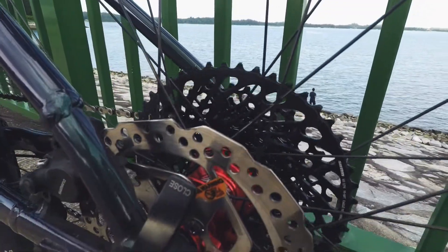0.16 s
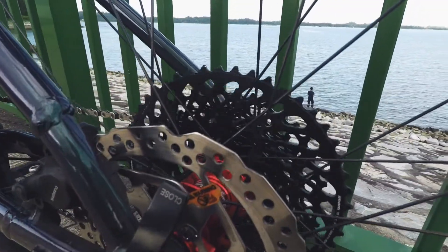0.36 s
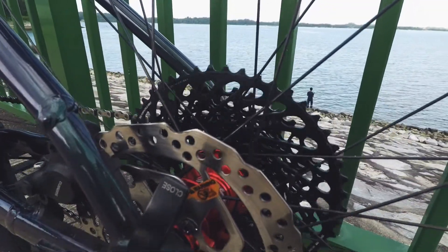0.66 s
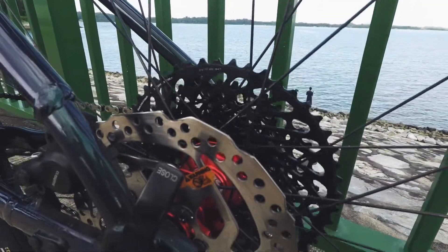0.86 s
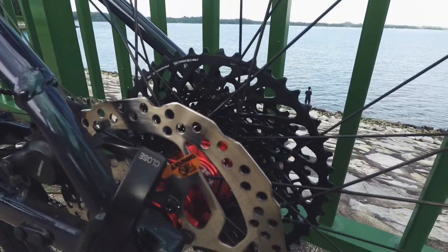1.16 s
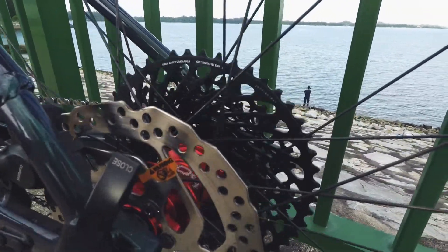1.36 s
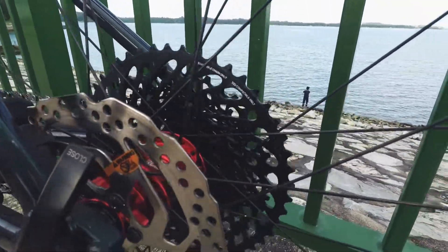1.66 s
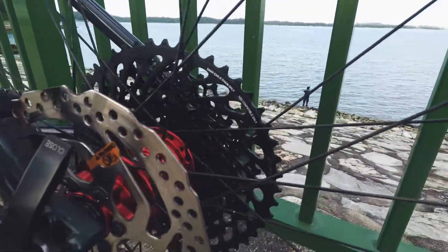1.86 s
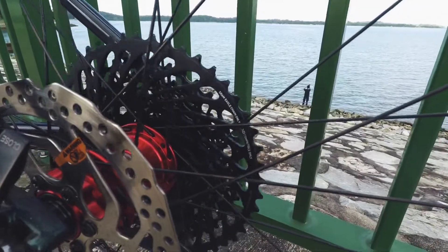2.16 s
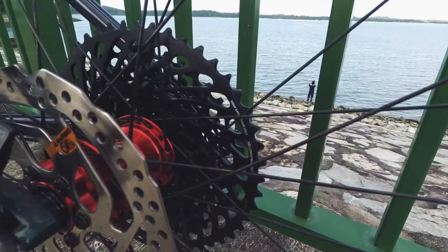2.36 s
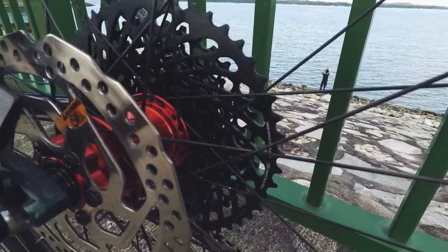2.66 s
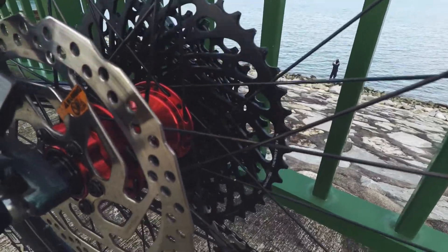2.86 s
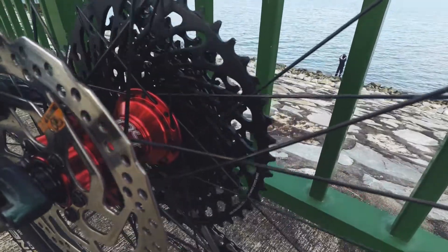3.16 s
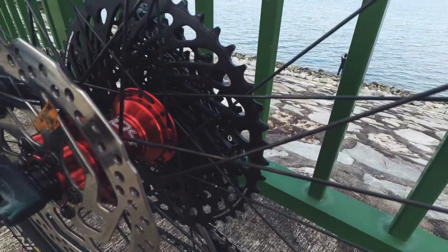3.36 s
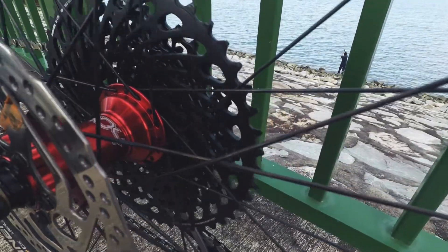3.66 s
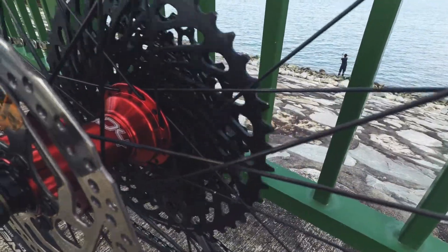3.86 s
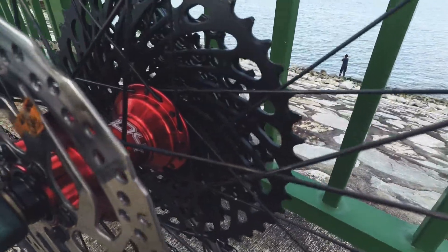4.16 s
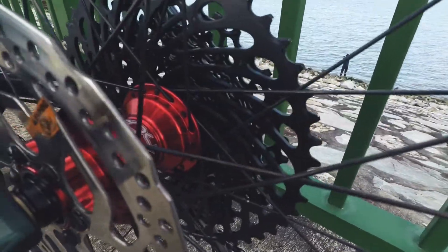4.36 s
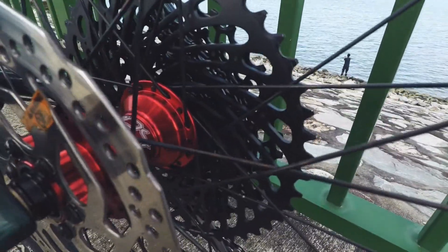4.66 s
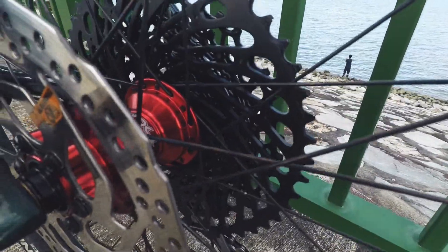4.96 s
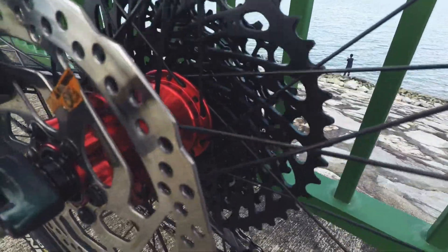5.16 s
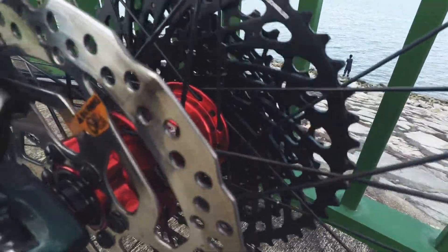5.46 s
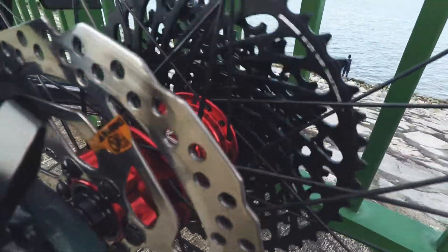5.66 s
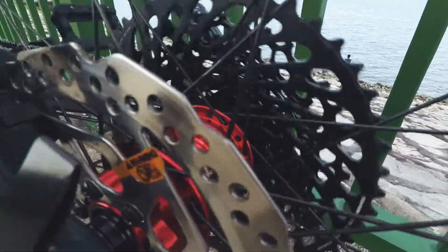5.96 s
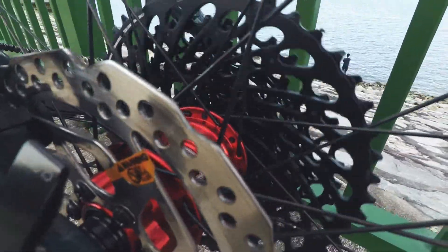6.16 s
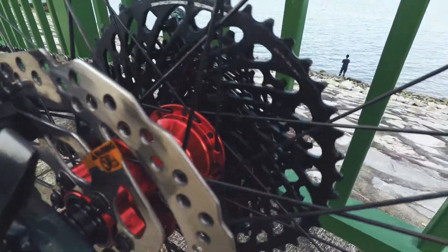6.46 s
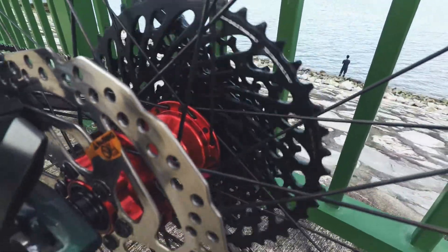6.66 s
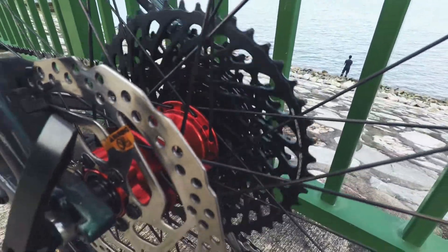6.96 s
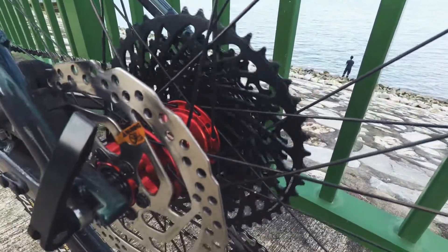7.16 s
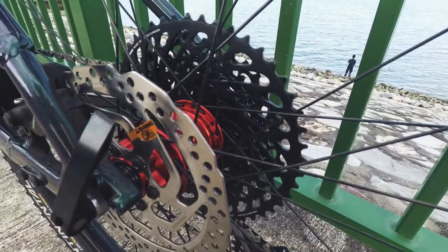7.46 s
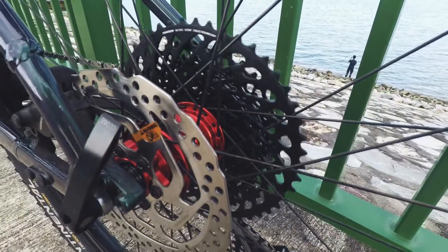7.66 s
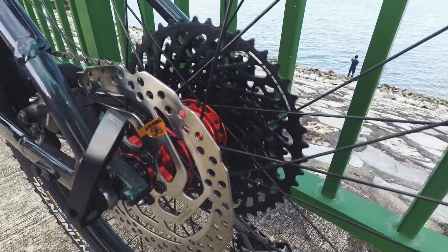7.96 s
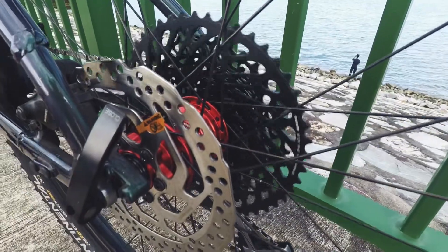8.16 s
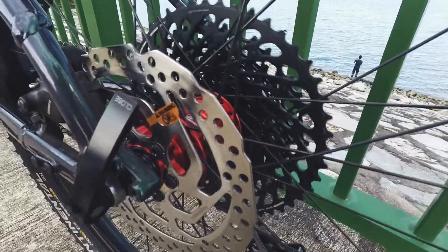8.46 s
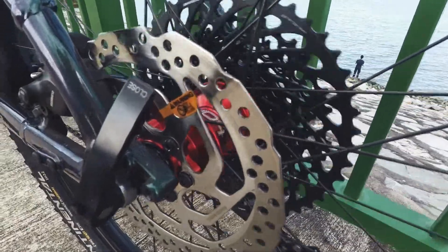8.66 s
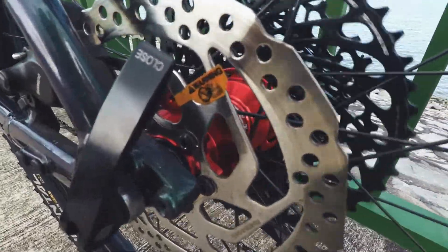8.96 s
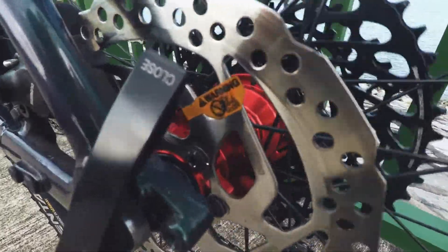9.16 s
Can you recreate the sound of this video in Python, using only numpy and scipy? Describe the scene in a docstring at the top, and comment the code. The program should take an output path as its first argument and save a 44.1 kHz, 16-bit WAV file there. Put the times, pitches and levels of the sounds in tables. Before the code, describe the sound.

A bicycle's rear hub is heard very close, centred and dry, outdoors over a quiet low rumble and thin hiss. From 0.2 s, separate bright steel clicks come unevenly, about ten a second, slowing to five to seven between 2 and 3.4 s, then quickening slightly until 3.8 s. Each has a tiny gritty squeak rising into a sharp snap, then a brief clatter and faint ring. Low wind buffets thump the microphone, strongest at 0.25 s and 1.3-2.5 s, with small crackly rustles. From 3.9 to 4.9 s the hub nearly rests: only faint brushes at 4.3 and 4.8 s. Four slower clicks follow from 5.0 s, then from 5.45 s a continuous ratchet accelerates to around twenty clicks a second, peaking near 6 s, easing around 7 s and wavering until the end at about 9.3 s. Wind dies away after 5 s and returns softly at 8-8.8 s.

```python
"""A bicycle's rear hub ratchets close to a microphone, over a distant outdoor rumble and a thin hiss.
First come slow, uneven clicks while gusts buffet the microphone. In the pause near 4 s only faint brushes
of a pawl are left. Four slow clicks follow, then a continuous run at changing speed; the wind dies down
and comes back near 8 s. For each click a pawl (a sprung catch) scrapes up its tooth with a short squeak,
drops, and rings the hub, cassette and brake rotor. Shaped noise and decaying tones make all of it."""
import sys
import numpy as np
from scipy import signal
from scipy.fft import rfft, irfft
from scipy.io import wavfile
from scipy.ndimage import uniform_filter1d

SR = 44100
rng = np.random.default_rng(int(sys.argv[2]) if len(sys.argv) > 2 else 0)


def transcribe(u):
    """Save the signal u as a 16-bit wav file named by the first command-line argument.

    u: samples, shape (n,) or (channels, n), limited to [-1, 1]; the rate is SR.
    q: integer samples, one column per channel.
    """
    v = np.clip(np.atleast_2d(u).T, -1, 1)
    q = np.round(v * 32767).astype(np.int16)
    wavfile.write(sys.argv[1], SR, q)


N = 410130
TIME = np.arange(N) / SR

# how the hub is heard from the side that faces the microphone, before each layer's own gain:
# (time [s], glint level [dB], scrape level [dB], lowest shell mode level [dB])
HUB_ASPECT = [(0, -30.5, -30, -20), (1.2, -42, -32, -31), (2, -51, -35.5, -21), (3.4, -34, -32, -15.5),
              (5.3, -34, -29.5, -23), (6, -39.5, -36, -11), (7.8, -41, -32, -25), (9.1, -44, -40, -6.5)]


def undb(db):
    """Turn decibels into a gain."""
    return 10 ** (np.asarray(db) / 20)


def curve(rows):
    """Join each column of a timed table by straight lines."""
    s, *columns = np.transpose(rows)
    return [np.interp(TIME, s, c) for c in columns]


def colour(x, points):
    """Filter by a spectrum of (frequency [Hz], level [dB]); white noise keeps its level."""
    hz, db = np.transpose(points)
    log_hz = np.log(np.fft.rfftfreq(N, 1 / SR) + 1)
    gain = undb(np.interp(log_hz, np.log(hz), db))
    gain /= np.sqrt(np.mean(gain ** 2))
    return irfft(rfft(x) * gain, N)


def noise(points):
    """Make noise of unit level with the given spectrum."""
    return colour(rng.standard_normal(N), points)


def walk(rate):
    """Wander smoothly at random, with about `rate` new targets a second and a spread near 1."""
    size = int(SR / rate)
    steps = rng.standard_normal(N // size + 2)
    path = np.interp(np.arange(N) / size, np.arange(len(steps)), steps)
    return 1.3 * uniform_filter1d(path, size)


def fade(t, t60):
    """Start at t = 0 and die away by 60 dB in t60 seconds."""
    return (t >= 0) * np.exp(-np.log(1000) * np.abs(t) / t60)


def bump(t, length_s):
    """Swell smoothly; the power stays above half for length_s."""
    return 2 ** (-2 * (t / length_s) ** 2)


def whine(hz, width_hz, size):
    """Make a tone whose phase wanders, which blurs its pitch."""
    wander = uniform_filter1d(rng.standard_normal(size), 64)
    phase_steps = 2 * np.pi * hz / SR + np.sqrt(2 * np.pi * width_hz / SR) * wander
    return np.sqrt(2) * np.sin(np.cumsum(phase_steps))


def add(track, s, x):
    """Mix x into the track, starting at s seconds."""
    i = int(s * SR)
    track[i:i + len(x)] += x[:N - i]


def surroundings(far_db=-36.5):
    """Far traffic and water make a rumble that swells slightly, under a thin hiss."""
    # spectrum of the distant rumble: (frequency [Hz], relative level [dB])
    far_spectrum = [(20, -10), (108, -53), (145, 2.5), (250, -3.5), (400, -11), (600, -15.5), (800, -14.5),
                    (1100, -23.5), (1600, -21.5), (2500, -31.5), (5000, -38), (10000, -41.5), (12500, -50),
                    (16000, -56)]
    # loudness of the thin hiss: (time [s], level [dB])
    hiss_level = [(0, -61), (1.8, -59), (4.1, -58), (4.25, -64), (9.3, -65)]
    # spectrum of the hiss: (frequency [Hz], relative level [dB])
    hiss_spectrum = [(2000, -24), (3500, 5), (6500, -21), (9500, 4), (11200, -6), (12500, -14),
                     (16000, -32)]
    far = undb(far_db + 0.29 * walk(2.69)) * noise(far_spectrum)
    hiss = undb(curve(hiss_level)[0]) * noise(hiss_spectrum)
    return far + hiss


def wind(flutter_db=3.0, eddy_db=-11, eddy_flutter_db=3):
    """Slow air pressure pushes on the microphone, with smaller eddies riding on it."""
    # strength of the wind, before its flutter: (time [s], level [dB])
    wind_level = [(0, -19), (.4, -21.5), (.6, -24), (1.1, -24.5), (1.5, -19), (1.7, -24), (1.97, -16.5),
                  (2.1, -22), (2.55, -20), (2.9, -26.5), (3.4, -24.5), (3.95, -28.5), (5.3, -41.5),
                  (6.2, -56.5), (7.7, -72), (8.35, -35), (8.75, -27), (9.3, -43.5)]
    # spectrum of the slow pressure: (frequency [Hz], relative level [dB])
    pressure_spectrum = [(10, -11), (25, -1), (60, 0.5), (120, 0.5), (200, -14.5), (350, -29.5), (800, -89)]
    # spectrum of the eddies: (frequency [Hz], relative level [dB])
    eddy_spectrum = [(70, -10), (130, 3), (200, 5.5), (300, -17.5), (450, -27.5), (700, -29.5),
                     (1200, -24.5), (2500, -64), (6000, -74)]
    pressure = undb(.5 + flutter_db * walk(24)) * noise(pressure_spectrum)
    eddies = undb(eddy_db + eddy_flutter_db * walk(30)) * noise(eddy_spectrum)
    return undb(curve(wind_level)[0]) * (pressure + eddies)


def buffets(low_hz=130, tilt_hz=260, gain_db=2.0, vortex_db=3, vortex_rate=60):
    """Each gust swells and fades while its vortices thump the microphone, up to its own upper edge."""
    # gusts, before the common gain:
    # (time [s], level [dB], length [s], upper edge [Hz])
    gusts = [(.01, -24, 0.029, 250), (0.248, -12, 0.024, 310), (.32, -23, 0.056, 222),
             (1.257, -15, .017, 250), (1.499, -11.5, 0.016, 460), (1.529, -15, 0.021, 800),
             (1.569, -20, 0.019, 404), (1.76, -29.5, 0.09, 385), (1.865, -21, 0.022, 394),
             (1.962, -20.5, 0.014, 368), (2.07, -29, 0.11, 443), (2.251, -26, 0.0064, 910),
             (2.32, -32.5, 0.032, 514), (2.372, -20.5, 0.013, 396), (2.43, -19, .012, 330),
             (2.5, -24.5, .026, 590), (2.754, -23, 0.015, 233), (3.118, -27, 0.015, 324),
             (3.435, -19.5, 0.019, 370), (7.97, -31, 0.069, 350), (8.17, -32, 0.16, 700),
             (8.355, -21.5, 0.09, 368), (8.443, -26, 0.044, 720), (8.6, -27.5, 0.085, 334)]
    out = np.zeros(N)
    vortices = undb(vortex_db * walk(vortex_rate))
    for s, db, length_s, edge_hz in gusts:
        band = np.vstack([signal.butter(2, low_hz, "high", fs=SR, output="sos"),
                          signal.butter(1, tilt_hz, fs=SR, output="sos"),
                          signal.butter(4, edge_hz, fs=SR, output="sos")])
        start = max(int((s - .5) * SR), 0)
        near = slice(start, start + SR)  # one second around the gust
        swirl = signal.sosfilt(band, rng.standard_normal(SR)) * vortices[near]
        swell = bump(TIME[near] - s, length_s)
        loudness = np.sqrt(np.average(swirl ** 2, weights=swell ** 2))
        out[near] += undb(db) * swell * swirl / loudness
    return undb(gain_db) * out


def rustles(grain_db=4.0, gain_db=3.5):
    """Short crackly rustles close to the microphone: noise with a quick, grainy flicker in level."""
    # rustles, before gain and grain: (time [s], level [dB], length [s])
    rustle_times = [(0.222, -47.5, 0.045), (1.357, -41, 0.04), (1.865, -41, 0.032), (1.944, -41.5, 0.023),
                    (2.424, -46, 0.012), (2.512, -42, 0.028)]
    swell = sum(undb(db) * bump(TIME - s, length_s) for s, db, length_s in rustle_times)
    grain = undb(gain_db + grain_db * walk(300))
    return swell * grain * noise([(400, -10), (900, 1), (1800, -2.5), (3500, -3),
                                  (6000, -8.5), (10000, -21), (15000, -46)])


def slips(length_s=0.013):
    """A pawl brushes faintly along its tooth without dropping while the wheel almost rests."""
    # moments of the brushes: (time [s], level [dB])
    slip_times = [(4.33, -50), (4.8, -44.5)]
    pressure = sum(undb(db) * np.exp(-((TIME - s) / length_s) ** 2) for s, db in slip_times)
    return pressure * noise([(1500, -14), (3500, 3), (6500, -6), (10000, -8), (15000, -26)])


def ratchet(snap_scatter_db=1.04, shell_scatter_db=0.52, scrape_hz=6240, scrape_scatter_hz=342):
    """Each passing tooth gives a click: rows of (time [s], snap [dB], hub shell [dB], scrape pitch [Hz])."""
    # single drops while the wheel barely turns:
    # (time [s], snap level above the usual [dB], scrape pitch [Hz])
    slow_clicks = [(.1724, 4.5, 6930), (.2866, 3.5, 6100), (.3772, 1, 5930), (.468, 1, 5840),
                   (.5751, 0.5, 5600), (.6679, 0.5, 5920), (.7442, 3.5, 7160), (.835, 2.5, 7030),
                   (.9558, 3.5, 6560), (1.0755, 3, 6600), (1.1774, 0, 6300), (1.262, -2, 5750),
                   (1.3358, -1, 5680), (1.4074, 0.5, 6170), (1.4798, -1, 7240), (1.5588, 1.5, 6640),
                   (1.6474, 1, 5960), (1.7787, 2.5, 5720), (1.9288, 2, 5750), (2.0604, 0, 5770),
                   (2.207, 1, 6070), (2.3804, 2, 6160), (2.5058, -1, 6510), (2.6509, -0.5, 6800),
                   (2.8429, 1, 6000), (3.0467, .5, 5730), (3.1927, .5, 5600), (3.3758, 1, 5850),
                   (3.4803, 1.5, 5990), (3.57, 0, 6860), (3.6707, -1, 6760), (3.755, -0.5, 6260),
                   (3.8313, -1.5, 6080), (4.9893, -3, 5880), (5.1272, -2.5, 5880), (5.2648, -2.5, 5930),
                   (5.365, -2, 5870)]
    # speed once the ratchet keeps turning: (time [s], speed [teeth per second])
    tooth_speed = [(5.4524, 10.4785), (5.68, 20.8905), (5.81, 20.0205), (5.97, 26.2027), (6.2, 18.4239),
                   (6.59, 18.3478), (6.8, 15.8789), (6.97, 17.6661), (7.24, 15.6643), (7.47, 18.9734),
                   (7.98, 20.2487), (8.02, 22.0038), (8.56, 24.1804), (8.6, 20.5597), (8.85, 17.4061),
                   (9.03, 23.2033), (9.14, 16.0678), (9.3, 20.2159)]
    # loudness of the drops, before scatter and gains:
    # (time [s], snap level [dB], hub shell level [dB])
    nearness = [(0, -25, -29), (1.2, -22.5, -26.5), (3.6, -21.5, -29.5), (5.9, -20, -27.5),
                (6.6, -20.5, -28), (7.7, -25.5, -28.6), (8.1, -23.5, -28.5), (9.3, -19, -28.5)]
    start_s = tooth_speed[0][0]
    teeth = np.cumsum(curve(tooth_speed)[0] * (TIME >= start_s)) / SR  # teeth passed so far
    run_s = np.r_[start_s, TIME[np.searchsorted(teeth, np.arange(1, teeth[-1]))]]
    # the spring drops every pawl about equally hard at any speed; teeth differ a little
    force, pitch = rng.standard_normal((len(run_s), 2)).T
    run = np.c_[run_s, snap_scatter_db * force, scrape_hz + scrape_scatter_hz * pitch]
    s, accent_db, hz = np.vstack([slow_clicks, run]).T
    snap_db, shell_db = (np.interp(s, TIME, db) for db in curve(nearness))
    shell_db = shell_db + shell_scatter_db * rng.standard_normal(len(s))
    return np.c_[s, snap_db + accent_db, shell_db, hz]


def wheel(blows, clicks, clatter_db=-3.5, clatter_t60=0.084, wash_db=-24, wash_t60=0.87,
          ring_db=-48, detune=0.0128):
    """Spokes and sprockets spread each blow into clatter and a faint wash; plate modes ring on."""
    # rings of cassette and rotor, before detuning and the common gain:
    # (frequency [Hz], level [dB], time to fall by 60 dB [s])
    ring_modes = [(1263, 2, 0.4), (2460, 0.5, 0.23), (2376, 2.5, 0.21), (2818, 1, 0.2), (3160, -23, 0.23),
                  (3860, -2.5, 0.2), (4620, 0, 0.077), (5090, 13, 0.041), (5900, -27, 0.066),
                  (6540, -16, 0.18), (6820, 4.5, 0.07), (7283, -34, 0.43), (8300, -11, 0.036),
                  (9130, 2.5, 0.09)]
    t = np.arange(SR // 4) / SR
    tail = fade(t, clatter_t60) + undb(wash_db) * fade(t, wash_t60)
    tail *= 1 - fade(t, 0.0029)  # a quick build-up
    hz, db, t60 = np.transpose(ring_modes)[:, :, None]
    decays = undb(db) * fade(t, t60)
    clatter, ring = np.zeros((2, N))
    starts = [s - .015 for s, *_ in clicks]
    for start, end in zip(starts, starts[1:] + [N / SR]):
        blow = blows[int(start * SR):int(end * SR)]
        paths = rng.standard_normal(len(t)) * tail / np.linalg.norm(tail)
        # the modes shift for each click as the wheel turns
        click_hz = hz * (1 + detune * rng.standard_normal(hz.shape))
        modes = decays * np.sin(2 * np.pi * click_hz * t)
        add(clatter, start, signal.fftconvolve(blow, paths))
        add(ring, start, signal.fftconvolve(blow, modes.sum(0)))
    clatter = colour(clatter, [(1200, 14.5), (2500, 10.5), (4000, 2.0), (7000, -3.5),
                               (11000, 0.0), (16000, -3)])
    return undb(clatter_db) * clatter + undb(ring_db) * ring


def scrapes(clicks, rise_t60=0.05, ring_t60=0.03, width_hz=175, stray_db=-5, grit_db=-3,
            squeak_db=3.5, scatter_db=2, usual_gap_s=0.064, drag=0.2):
    """The spring tightens as a pawl climbs: a gritty squeak swells up to the drop, then rings out."""
    # pitches at which the other pawls squeak: frequency [Hz]
    pawl_hz = [6400, 6330, 7050, 6930, 8000, 8620]
    before = .05 - np.arange(int(.075 * SR)) / SR  # seconds left until the drop
    # a slower wheel draws the squeak out
    slowness = (np.gradient(clicks[:, 0]) / usual_gap_s).clip(None, 2) ** drag
    squeak, grit = np.zeros((2, N))
    for (s, _, _, hz), stretch in zip(clicks, slowness):
        swell = fade(before, rise_t60 * stretch)
        voice = np.maximum(swell, fade(-before, ring_t60))
        force = undb(scatter_db * rng.standard_normal())
        # the other two pawls squeak more softly, at their own pitches
        stray_hz = rng.choice(pawl_hz, 2, replace=False)
        strays = sum(whine(f, width_hz, len(before)) for f in stray_hz)
        tones = whine(hz, width_hz, len(before)) + undb(stray_db) * strays
        add(squeak, s - before[0], force * voice * tones)
        add(grit, s - before[0], force * swell * rng.standard_normal(len(before)))
    grit = colour(grit, [(900, -19), (1280, -4.5), (1600, -9), (2300, -5), (3200, -1), (4500, -4.0),
                         (6500, -12.0), (8800, -15), (10000, -18), (15000, -36)])
    return undb(squeak_db + curve(HUB_ASPECT)[1]) * (squeak + undb(grit_db) * grit)


def drops(clicks, spread_s=.002, impact_t60=0.015, early_db=-6.5, late_db=-4.0, evenness=0.47,
          seat_db=3.5, seat_hz=600, seat_full_hz=6000):
    """Three pawls land almost together, the hardest marking the click; their seating colours the blow."""
    # spectrum of the pawl's snap: (frequency [Hz], relative level [dB])
    snap_spectrum = [(3800, -26.5), (4800, -10), (5400, 1.5), (6000, 5), (6600, -1.5), (7100, 6),
                     (7600, -4.5), (8000, 2.5), (8800, -5), (9700, -21.5), (11000, -31)]
    # spectrum of the hub shell's knock: (frequency [Hz], relative level [dB])
    shell_spectrum = [(700, -24.5), (1080, -22.5), (1280, -5), (1480, -14.5), (1800, -14), (2250, -2.5),
                      (2600, 2), (3200, 5), (3800, 3), (4400, 1), (5200, -19)]
    # spectrum of the snap's high glint: (frequency [Hz], relative level [dB])
    glint_spectrum = [(8000, -20), (9500, 3.5), (11200, -2.5), (12000, -7), (12600, 1.5), (13500, -2),
                      (15100, 2.5), (16500, -10)]
    lead = .01  # seconds of room ahead of the click
    t = np.arange(int(3 * lead * SR)) / SR - lead
    hz = np.fft.rfftfreq(len(t), 1 / SR)
    treble = np.minimum(hz / seat_full_hz, 1)  # the seating matters most to the high pitches
    snap, shell, glint = np.zeros((3, N))
    for s, snap_db, shell_db, _ in clicks:
        early, late = spread_s * (np.array([-.8, 1.2]) + .4 * rng.standard_normal(2))
        impacts = [fade(t + .0008, impact_t60),
                   undb(early_db) * fade(t - early, impact_t60),
                   undb(late_db) * fade(t - late, impact_t60)]
        force = np.linalg.norm(impacts, axis=0)
        chatter = rfft(force * np.sign(rng.standard_normal(len(t))))
        seat = treble * np.interp(hz / seat_hz, np.arange(64), rng.standard_normal(64))
        # hard steel contact excites all pitches, so the spectrum is partly evened out
        even = chatter / np.abs(chatter + 1e-9) ** evenness
        burst = irfft(undb(seat_db * seat) * even, len(t))
        burst /= np.sqrt(np.sum(burst ** 2) / (lead * SR))
        add(snap, s - lead, burst * undb(snap_db))
        add(shell, s - lead, burst * undb(shell_db))
        add(glint, s - lead, burst)
    glint_db, _, mode_db = curve(HUB_ASPECT)
    # the lowest shell mode
    knock = colour(shell * undb(mode_db), [(1800, -49), (2060, -7.5), (2300, 0.5), (2700, -27)])
    glint = colour(glint * undb(glint_db - 2.5), glint_spectrum)
    snap = undb(-3.0) * colour(snap, snap_spectrum)
    shell = undb(-1.5) * colour(shell, shell_spectrum)
    return snap + shell + knock + glint


def scene():
    """Add up all the sources and send the same sound to both channels, as if from straight ahead."""
    clicks = ratchet()
    blows = drops(clicks)
    background = surroundings() + wind() + buffets() + rustles()
    hub = slips() + wheel(blows, clicks) + scrapes(clicks) + blows
    mono = background + hub
    return np.array([mono, mono])


def record(dry, lean_db=0.9, split_hz=11500, top_hz=15400):
    """Round loud peaks, let the highest treble reach the two ports differently, and cut the top."""
    ceiling = .9
    soft = ceiling * np.tanh(dry / ceiling)
    hz = np.fft.rfftfreq(N, 1 / SR)
    apart = 1 / (1 + (split_hz / (hz + 1)) ** 20)  # 0 below the split, 1 above
    # level and phase shift one way in one port, the opposite way in the other
    ports = undb(lean_db * apart) * np.exp(1j * apart * np.pi / 4)
    wide = irfft(rfft(soft) * np.array([ports, 1 / ports]), N)
    return signal.sosfilt(signal.ellip(8, .2, 70, top_hz, fs=SR, output="sos"), wide)


dry = scene()
out = record(dry)
transcribe(out)
```